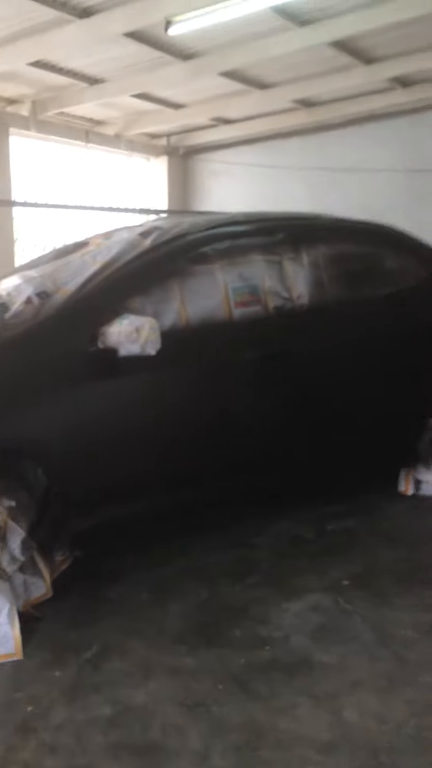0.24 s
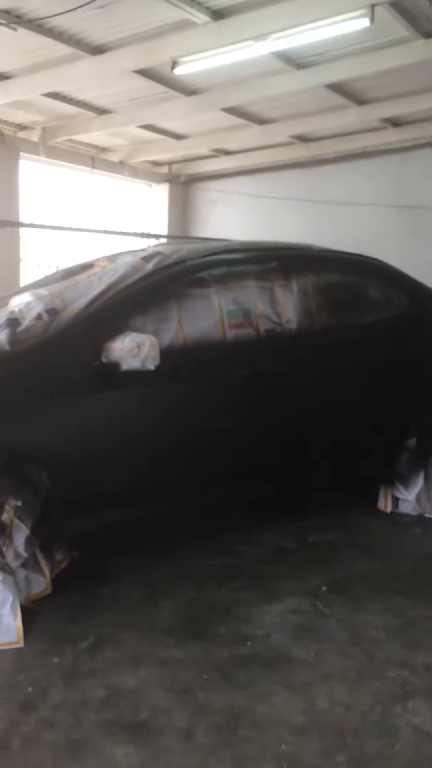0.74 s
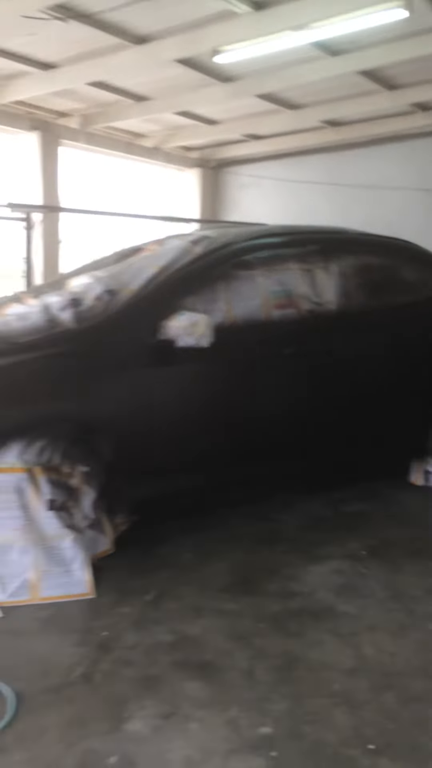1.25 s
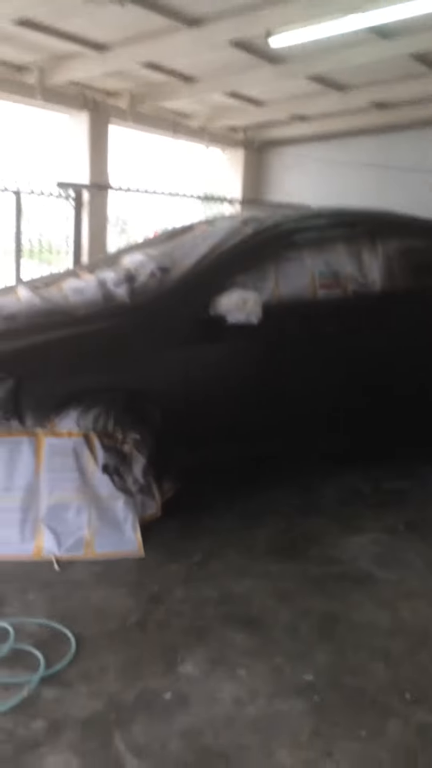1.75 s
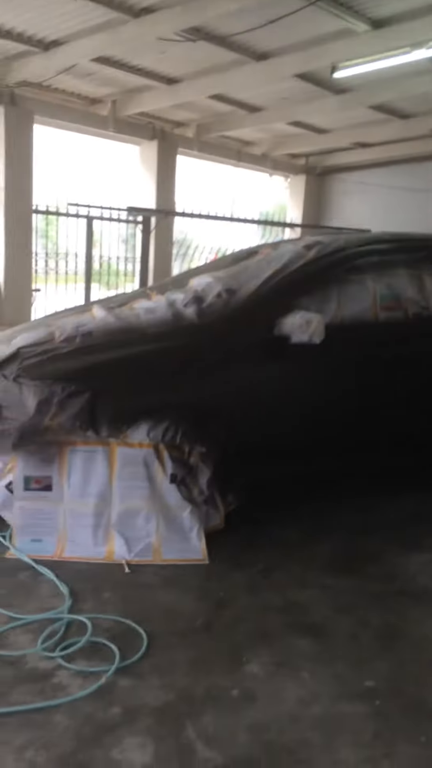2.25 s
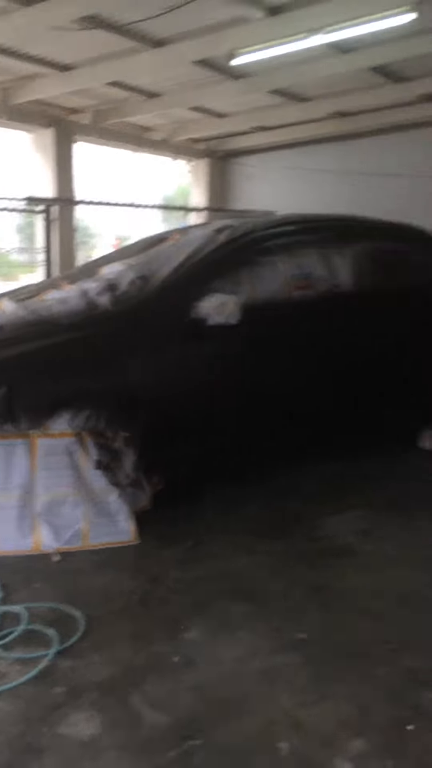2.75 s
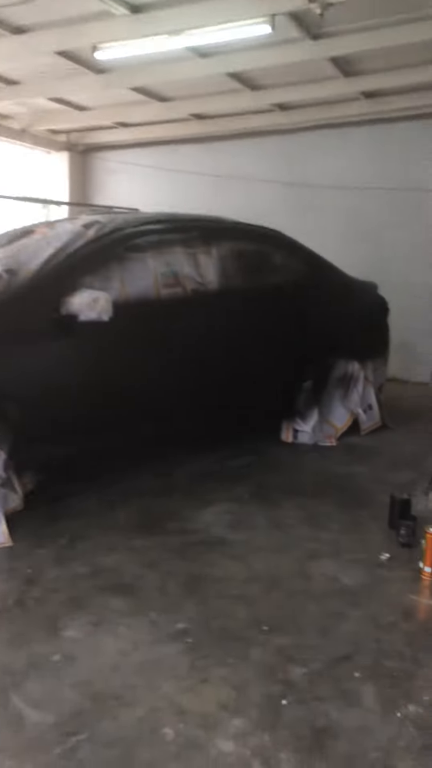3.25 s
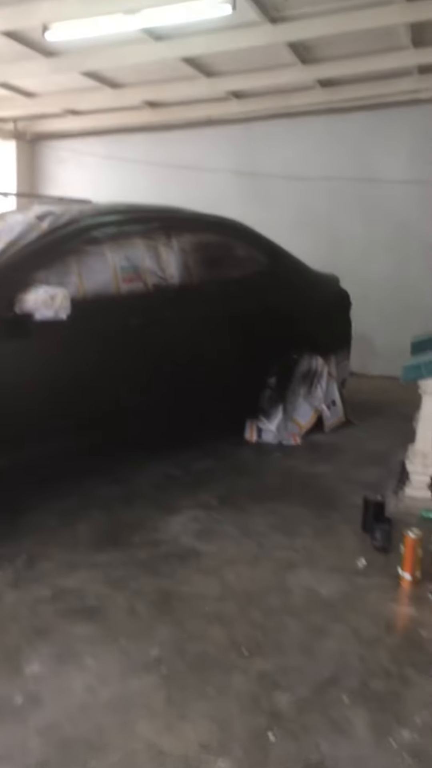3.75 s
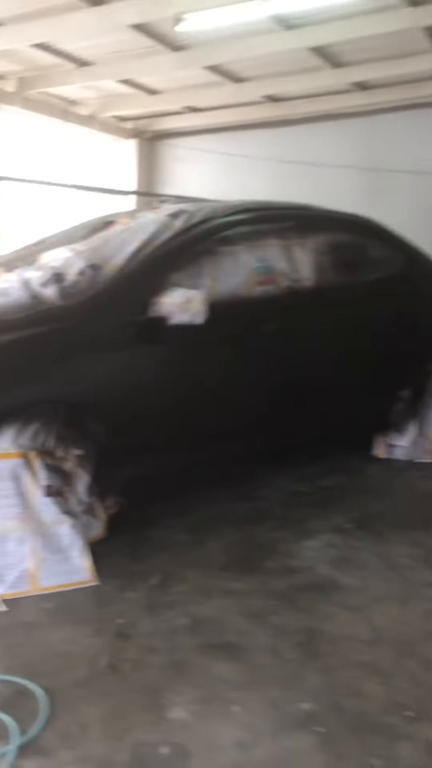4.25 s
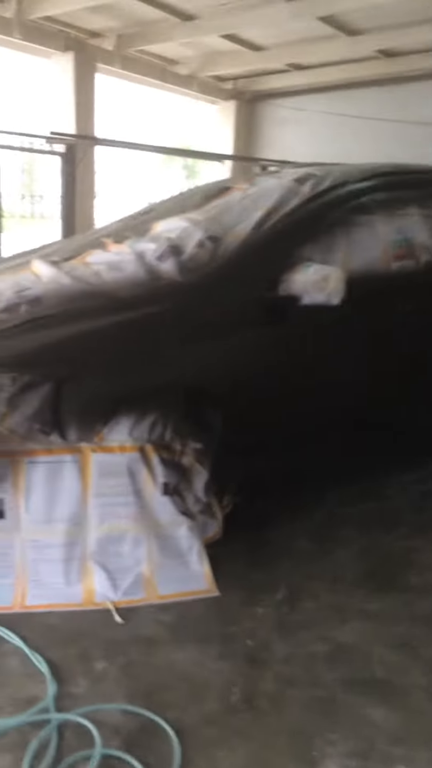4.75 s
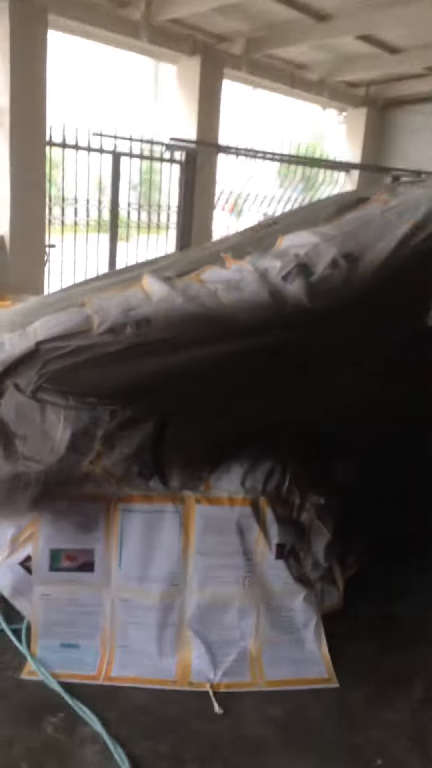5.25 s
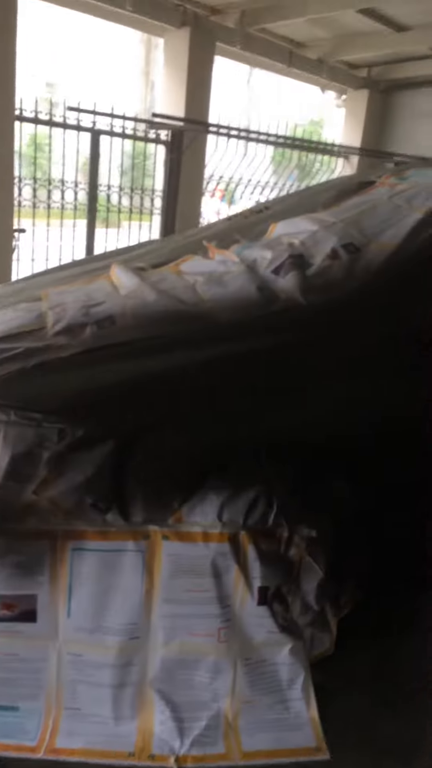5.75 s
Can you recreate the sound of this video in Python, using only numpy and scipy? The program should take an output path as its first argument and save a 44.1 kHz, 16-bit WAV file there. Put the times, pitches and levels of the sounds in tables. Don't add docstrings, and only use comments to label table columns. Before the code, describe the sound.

Fast, pulsing compressor hum with rattling valves and breathy air hiss fills an echoing garage; a spray gun spits briefly in the first half second.

```python
import sys
import numpy as np
from scipy import signal
from scipy.fft import rfft, irfft, next_fast_len
from scipy.io import wavfile
from scipy.ndimage import uniform_filter1d, map_coordinates

SR = 44100
rng = np.random.default_rng(int(sys.argv[2]) if len(sys.argv) > 2 else 0)


def convert_level_to_amplitude(level_db):
    exponent = np.asarray(level_db, float) / 20
    return 10 ** exponent


def materialize(psi):
    bounded = np.clip(np.atleast_2d(psi).T, -1, 1)
    quanta = np.round(bounded * 32767).astype(np.int16)
    wavfile.write(sys.argv[1], SR, quanta)


N = 264159
T = np.arange(N) / SR
TURNS_PER_S = 10.751
CRANK = TURNS_PER_S * T


def intake_pipe():
    crest_rule = -.397, .18, -.043, -.047
    lead_rule = .455, .22, -.227, -.12
    crest, lead = heard(crest_rule), heard(lead_rule)
    db21, db22, db24, db25 = map(heard, ("order 21", "order 22", "order 24", "order 25"))
    between_db = heard("order 23")
    shell_db = heard("shell") - 2.5

    since_level = T - 2.8
    middle = .1 + .1 * since_level
    top = lead - .37 - .175 * since_level
    # crank order, level in dB, phase in cycles.
    lines = [(18, shell_db, -.05), (20, db21 - 17, .2), (21, db21, 0), (22, db22, 0),
             (23, between_db, middle), (24, db24, lead), (25, db25, top), (26, db25 - 11, top + .55)]
    tone = np.zeros(N)
    for order, db, cycles in lines:
        phase = order * CRANK - (order - 22) * crest + cycles + 0.023 * wobble(7)
        level = np.sqrt(2) * convert_level_to_amplitude(db + 0.61 * wobble(8))
        tone += level * np.cos(2 * np.pi * phase)

    gulp = swell(crest, 4.3) * rng.standard_normal(N)
    gulp = resonant(gulp, [(241.5, 20, -10.5), (247.3, 46.4, -0.5)])
    return tone + convert_level_to_amplitude(-43) * unit(gulp)


def pipe_overtones():
    # time in s, lift in dB, depth of swell once a turn, depth twice a turn, warble in radians.
    mode_swells = [
        (.2, 1.5, .25, .2, .9),
        (.55, -2.5, .4, .2, 1.3),
        (.9, -.5, .52, .65, 1),
        (1.9, 0, .52, .66, 1),
        (3.3, -.5, .15, .4, 1.3),
        (4.1, 1, -.48, .14, .9),
        (4.75, 2, -.1, .08, 0),
        (5.06, -3.5, .1, .2, .3),
        (5.35, 1.5, .1, .35, .8),
        (6, -2.5, .2, .3, 1.6),
    ]
    # frequency in Hz, width in Hz, level in dB.
    second_modes = [(462.7, 26.6, -13.5), (526.6, 27, -9.5)]
    third_part = [(744.5, 33, 0)], [(.27, 0)], 0.068
    second_db, third_db = heard("second"), heard("third")
    lift_db, depth_1, depth_2, warble = curves(mode_swells)

    slip = .165 * T
    angle_1, angle_2 = .32 + slip, -.14 + slip
    once = depth_1 * np.cos(2 * np.pi * (CRANK - angle_1))
    twice = depth_2 * np.cos(4 * np.pi * (CRANK - angle_2))
    throb = 1 + 1.25 * (once + twice)

    order = 46
    phase = 2 * np.pi * (order * CRANK + .06 * wobble(6))
    line = np.sqrt(2) * np.cos(phase + warble * np.sin(2 * np.pi * (CRANK - angle_1)))
    turbulence = convert_level_to_amplitude(-6) * steady(resonant(rng.standard_normal(N), second_modes))
    second = convert_level_to_amplitude(second_db + lift_db - .5) * steady(throb * (line + turbulence))
    return second + struck(third_part, third_db - 0.5, wet_db=7.0, sharp=0.32)


def valves():
    # resonances (Hz, width in Hz, dB), blows (crank angle in turns, dB), turbulence share 0-1.
    discharge_part = [(985, 50, 0), (1038, 24, -6)], [(.93, 0)]
    intake_part = [(1112, 46, -7.5), (1164, 32, 0), (1258, 30, -7)], [(.18, 0), (.34, -2), (.66, -5)], .5
    head_part = [(1359, 51, 0.23), (1487, 21, -1.2)], [(.05, 1), (.35, -1.5)], 0.18
    plate_part = [(1800, 35, -7), (1848, 20, 0), (1885, 30, -7), (1955, 35, -10)], [(.55, 0), (.85, 0)], .65
    flutter_rule = .55, .6, -1.4, 0
    flutter = np.clip(heard(flutter_rule), .07, .8)
    discharge = struck((*discharge_part, flutter), heard("discharge") - .8, wet_db=-4, sharp=0.36)
    intake = struck(intake_part, heard("intake") - .8, wet_db=-4, sharp=0.064)
    head = struck(head_part, heard("head") - 7.5, wet_db=-9.5, sharp=.4)
    plate = struck(plate_part, heard("plate") + 1.0, wet_db=6.0, sharp=0.09)
    return discharge + intake + head + plate


def tank():
    # resonances (Hz, width in Hz, dB), blows (crank angle in turns, dB), turbulence share 0-1.
    boom_part = [(82.1, 4.1, 0), (103.4, 17.6, 0.0057)], [(.25, 0)], .4
    rumble_part = [(134.5, 25, 0.5), (155.7, 22, -16)], [(.2, -8.5), (.55, -9)], 0.24
    shell_part = [(179, 10.2, 0.54), (181.5, 8.5, -1.5)], [(.4, 0)], 0.36
    frame_part = [(365, 20, -1.7), (401, 12.4, -0.24), (443.3, 19.4, 0.99)], [(.4, 0)], 0.63
    boom = struck(boom_part, heard("boom") - .7, wet_db=2.0, sharp=0.22)
    rumble = struck(rumble_part, heard("rumble") - .7, wet_db=3.5, sharp=0.24)
    shell = struck(shell_part, heard("shell") - 3.5, wet_db=1.5, sharp=0.37)
    frame = struck(frame_part, heard("frame") - 0.5, wet_db=5.5, sharp=1.0)
    return boom + rumble + shell + frame


def spray_gun():
    # centre in s, length in s, level in dB.
    gun_spits = [
        (0.02, .05, -51),
        (0.322, 0.043, -53),
        (0.444, 0.066, -38.5),
    ]
    trigger = np.zeros(N)
    for s, length, db in gun_spits:
        trigger += convert_level_to_amplitude(db) * np.exp(-.5 * ((T - s) / (.5 * length)) ** 2)
    return trigger * unit(resonant(rng.standard_normal(N), [(3230, 1300, 0)]))


def air():
    # frequency in Hz, density in dB per Hz.
    air_colour = [(25, -14), (70, -4), (250, -14.5), (340, -6.5), (600, -8), (880, -5.5), (1400, -3),
                  (1700, -8.5), (2100, -14), (3000, -14), (4000, -19.5), (7700, -33.5), (11000, -44),
                  (15700, -59.5)]
    # frequency in Hz, width in Hz, lift in dB.
    passages = [(2236, 280, 4.5), (2595, 58, 1.5), (2956, 85, 5.5), (3470, 210, 2), (3810, 240, 3),
                (6870, 250, 3), (7830, 340, 3), (13200, 900, 3.5)]
    hz, density_db = np.transpose(air_colour)

    def colour(f):
        lift = sum(gain / (1 + (2 * (f - centre) / width) ** 2) for centre, width, gain in passages)
        return convert_level_to_amplitude(np.interp(np.log(f + 1), np.log(hz), density_db) + lift)

    spectrum = signal.stft(rng.standard_normal(N + 600), nperseg=512)[2]
    patches = uniform_filter1d(rng.standard_normal(spectrum.shape), size=8, axis=0)
    patches = uniform_filter1d(patches, size=8, axis=1)
    noise = signal.istft(spectrum * convert_level_to_amplitude(0.88 * unit(patches)), nperseg=512)[1][:N]
    hiss = unit(filtered(noise * convert_level_to_amplitude(0.11 * wobble(12)), colour))

    top = filtered(hiss, lambda f: f ** 4 / (f ** 4 + 8500 ** 4))
    body = (hiss - top) * (0.79 + 0.29 * swell(0.45, 1.16))
    fizz = top * convert_level_to_amplitude(heard("fizz")) * (1.11 + 0.55 * swell(0.8, 0.92))
    return convert_level_to_amplitude(heard("flow") + 17) * (body + fizz)


def struck(part, level_db, wet_db, sharp):
    modes, blows, share = part
    share = np.clip(share, 0, 1)
    hits, puffs = np.zeros(N + SR), np.zeros(N)
    turn = np.arange(int(CRANK[-1]) + 1)
    for angle, db in blows:
        at = ((turn + angle % 1) * SR / TURNS_PER_S).round().astype(int)
        hits[at] += convert_level_to_amplitude(db + rng.normal(0, 0.61, len(at)))
        puffs += convert_level_to_amplitude(db) * swell(angle + 0.055, sharp)
    ring = unit(resonant(hits[:N], modes))
    ring = steady(walking_room(ring, wet_db))
    breath = steady(resonant(puffs * rng.standard_normal(N), modes))
    return convert_level_to_amplitude(level_db) * steady(np.sqrt(1 - share) * ring + np.sqrt(share) * breath)


def heard(rule):
    # time in s, toward the open door, facing the pump, along the wall, the last three -1 to 1.
    standpoint = [(0.0, 0.6, 0.08, -0.32), (0.4, 0.16, -0.25, -0.86), (0.8, -0.11, -0.42, -0.24),
                  (1.2, -0.32, -0.49, 0.05), (1.59, -0.34, -0.31, 0.21), (1.99, -0.32, -0.15, 0.24),
                  (2.39, -0.37, 0.26, 0.12), (2.79, -0.37, 0.46, 0.06), (3.19, -0.38, 0.52, -0.05),
                  (3.59, -0.33, 0.28, 0.01), (3.99, -0.16, 0.01, -0.01), (4.39, 0.11, -0.11, -0.1),
                  (4.78, 0.19, -0.23, 0.11), (5.18, 0.42, -0.34, 0.23), (5.58, 0.88, -0.26, 0.49),
                  (5.98, 1.0, 0.35, 0.09)]
    part_rules = {"order 21": (-30.5, -3, 3.5, 4), "order 22": (-29.5, -7.5, -2, -1.5),
                  "order 24": (-35, -9, -3.5, 5.5), "order 25": (-43.5, 7.5, -10.5, -2.2),
                  "order 23": (-41, -13.5, 1.5, 9.5), "boom": (-44, 6.5, -1, 0.5),
                  "rumble": (-41, 0.5, -1, -4.8), "shell": (-39, -4.5, 0.2, -2),
                  "frame": (-47, .1, 1.5, 5.5), "discharge": (-36.5, -1, 2.4, -2),
                  "intake": (-33.5, 3, -1.8, 0.5), "head": (-41.5, 0.5, 6.5, 10),
                  "plate": (-44.4, 1.2, 0, -0.8), "second": (-37, 2, -3, 3.5),
                  "third": (-44.5, 1.4, -1.5, -0.5), "flow": (-51, 1.67, -0.4, -1.55),
                  "fizz": (.1, 1.5, -.3, .8)}
    mean, *slopes = part_rules[rule] if isinstance(rule, str) else rule
    return mean + np.dot(slopes, curves(standpoint))


def walking_room(x, wet_db):
    step, t60 = SR * 3 // 5, 0.7
    out, t = np.zeros(N + 4 * step), np.arange(step) / SR
    padded = np.pad(x, (step, 2 * step))
    for at in range(0, N + step, step):
        tail = rng.standard_normal(step) * convert_level_to_amplitude(-60 * t / t60)
        piece = padded[at:at + 2 * step] * np.hanning(2 * step)
        out[at:at + 3 * step - 1] += signal.fftconvolve(piece, tail / np.linalg.norm(tail))
    return x + convert_level_to_amplitude(wet_db) * out[step:step + N]


def swell(angle, sharp):
    return np.exp(sharp * (np.cos(2 * np.pi * (CRANK - angle)) - 1))


def resonant(x, modes):
    def response(f):
        total = 0
        for k, (centre, width, db) in enumerate(modes):
            damping = 1j * f * width
            total = total + (-1) ** k * convert_level_to_amplitude(db / 2) * damping / (centre * centre - f * f + damping)
        return total ** 2

    return filtered(x, response)


def filtered(x, response):
    m = next_fast_len(N + SR // 2)
    return irfft(rfft(x, m) * response(np.fft.rfftfreq(m, 1 / SR)), m)[:N]


def steady(x):
    power = uniform_filter1d(x ** 2, size=int(2 * SR / TURNS_PER_S))
    return x / np.sqrt(np.abs(power) + 1e-20)


def unit(x):
    return x / np.sqrt(np.mean(x ** 2) + 1e-20)


def curves(rows):
    s, *cols = np.transpose(rows)
    return [np.interp(T, s, c) for c in cols]


def wobble(rate):
    coarse = T[::64]
    knots = rng.standard_normal(int(N * rate / SR) + 4)
    return np.interp(T, coarse, map_coordinates(knots, [coarse * rate]))


def scene():
    machine = intake_pipe() + pipe_overtones() + valves() + tank()
    return (machine + spray_gun() + air())[None]


def band_limit(x):
    return signal.sosfilt(signal.butter(12, 15740, fs=SR, output="sos"), x)


def record(dry):
    return band_limit(dry)


dry = scene()
out = record(dry)
materialize(out)
```